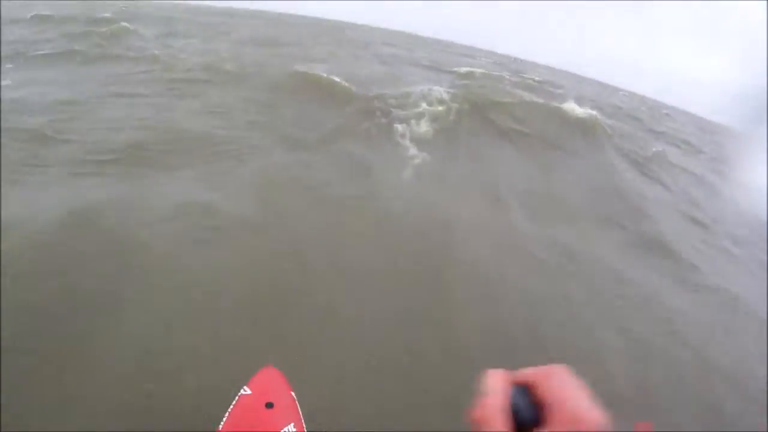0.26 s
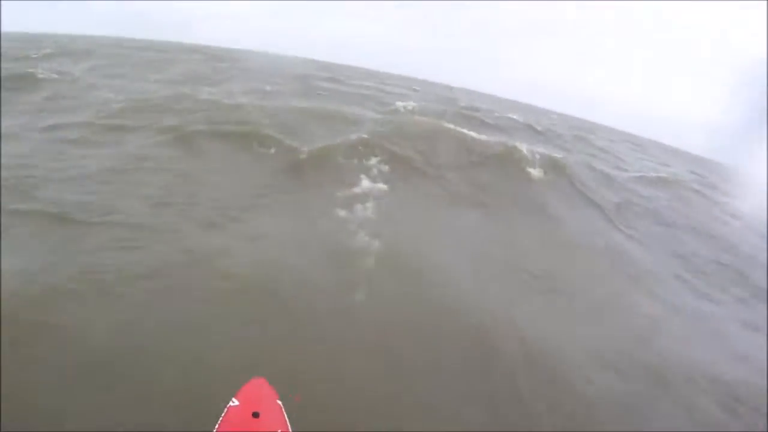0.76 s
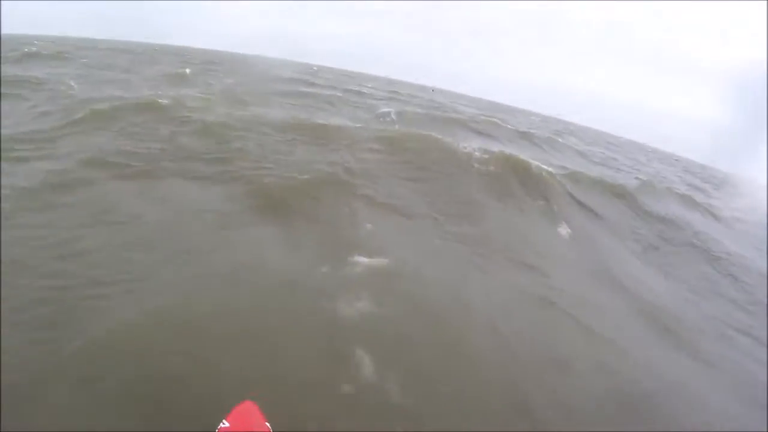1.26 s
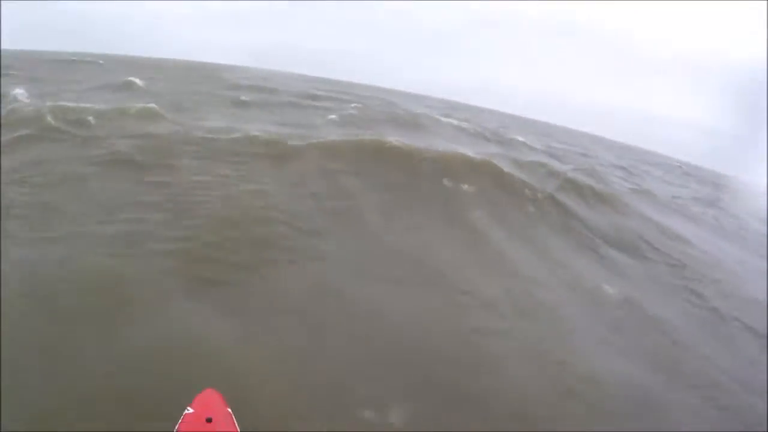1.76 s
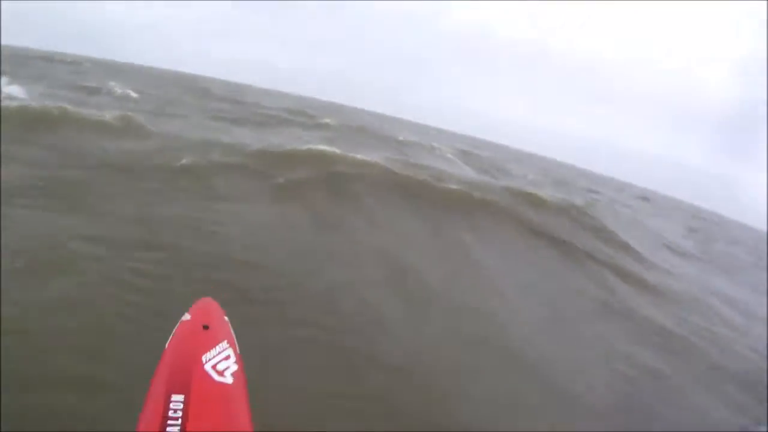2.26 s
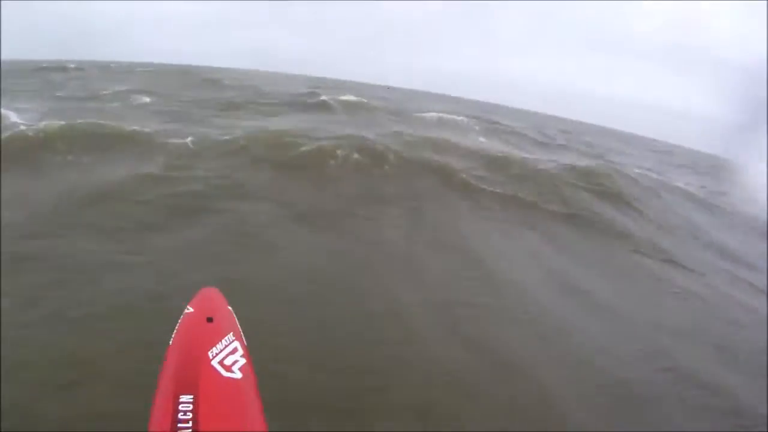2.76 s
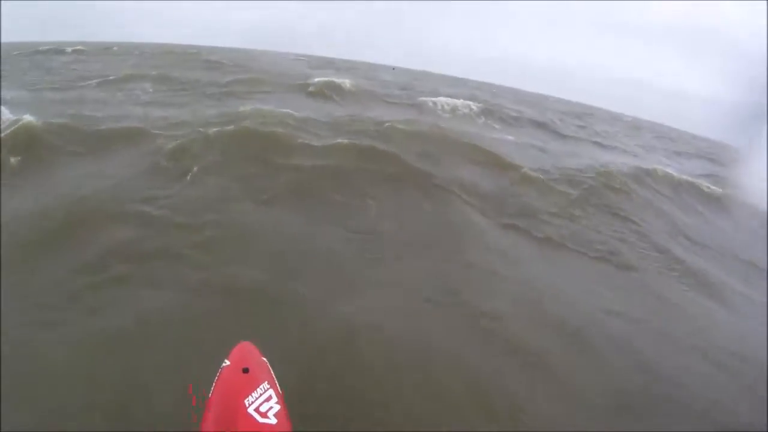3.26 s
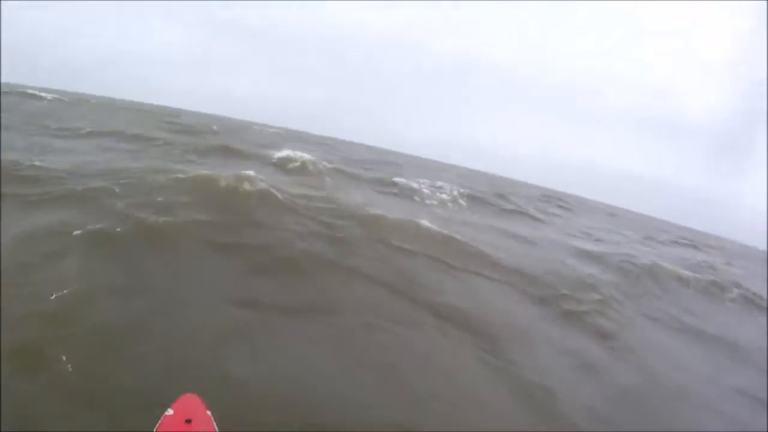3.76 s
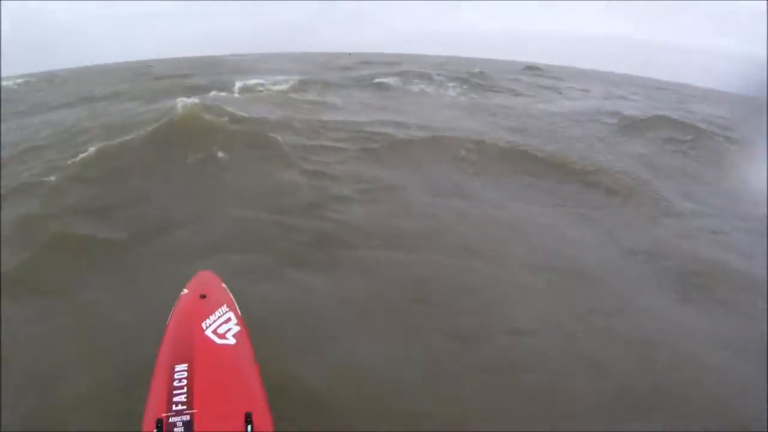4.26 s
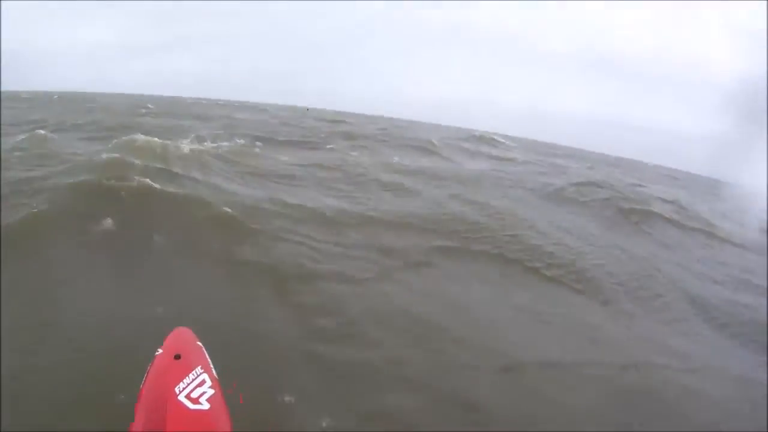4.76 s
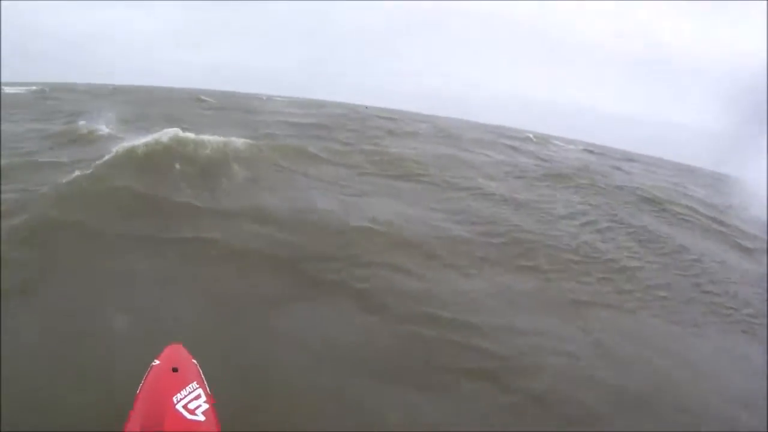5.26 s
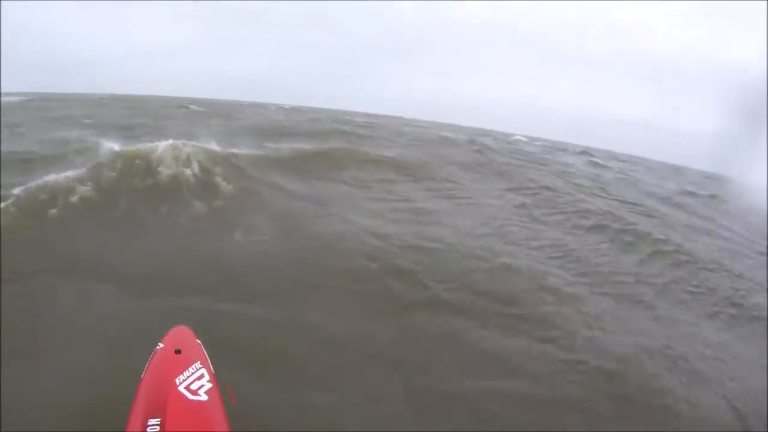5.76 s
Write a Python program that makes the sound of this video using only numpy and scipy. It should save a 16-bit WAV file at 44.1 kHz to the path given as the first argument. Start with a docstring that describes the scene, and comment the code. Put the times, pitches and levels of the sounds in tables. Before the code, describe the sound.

Continuous boxy wash and slosh along a hull, fuller and gushing in the first second and a half, then thinner and uneven, then hissier around three seconds. Fine mist crackles constantly and larger spray drops snap dry and short against the plastic around the microphone. Faint low gusts come and go, and two tiny wet gurgles slip by. Close, outdoor, no echo, nearly identical in both ears.

```python
"""On a board running through choppy, windy sea, the microphone sealed inside a plastic camera housing.
Foam hiss and water sloshing along the hull are noise passed through the resonances of the shell.
Spray and finer mist strike the shell itself and ring its modes for a few milliseconds.
Wind is low, lumpy noise swelling in gusts; short wet gurgles are puffs of narrow noise.
One capsule feeds both channels, each with its own faint circuit hiss."""
import sys
import numpy as np
from scipy import signal
from scipy.io import wavfile
from scipy.ndimage import uniform_filter1d

SR = 44100
rng = np.random.default_rng(int(sys.argv[2]) if len(sys.argv) > 2 else 0)


def persist_wave(psi):
    """Save psi, clipped to +-1, as 16-bit WAV."""
    counts = np.round(np.clip(psi, -1, 1) * 32767).astype(np.int16)
    wavfile.write(sys.argv[1], SR, np.atleast_2d(counts).T)


N = 265041

# Sea along the hull: (time [s], foam hiss level [dB], duller wash level [dB])
SEA_LEVELS = [(0, -57, -52), (.55, -54.5, -49), (1.05, -57, -49.5), (1.38, -56.5, -49), (1.6, -63, -53),
              (1.85, -58.5, -51.5), (2.05, -63.5, -53.5), (2.3, -59.5, -54), (2.45, -61, -58),
              (2.7, -54, -52), (3.05, -52, -53), (3.45, -53, -55), (3.75, -57, -57.5), (4.2, -60, -56),
              (4.5, -53.5, -53), (4.85, -55, -54), (5.1, -52.5, -51), (5.3, -52.5, -54),
              (5.6, -59.5, -58.5), (6.01, -58.5, -54.5)]
# Shell resonances, widths before narrowing, levels relative within a set:
# (frequency [Hz], width [Hz], level under hiss [dB], level under a drop [dB])
LOW_MODES = [(1489, 89, 2.5, -3), (1640, 178, 0.5, -12), (2016, 200, -9, -0.5), (2630, 390, 0.5, 9.5)]
MIDDLE_MODES = [(3470, 1020, 1, 9.5), (4440, 360, 1.5, -2), (4927, 1030, 5.5, 6), (5437, 390, -28, -8.5)]
HIGH_MODES = [(6885, 1280, -14.5, -3), (8230, 1350, -15, -11), (9820, 1300, -20, -18.5),
              (10360, 2980, -42, -1), (11700, 3500, -18.5, -4), (14600, 3200, -20, -2)]
# Air resonances in the shell: (frequency [Hz], width before narrowing [Hz], relative level [dB])
CAVITY_MODES = [(474, 35, -9.5), (673.4, 86, 0.5), (711.5, 21, -4), (888, 188, -7)]
# Resonance of the gush: (frequency [Hz], width before narrowing [Hz], relative level [dB])
GUSH_MODES = [(2046, 270, 0)]
# Swells of the gush: (time of the crest [s], length [s], rise [dB])
GUSH_SURGES = [(.42, .3, 6.5), (.72, 0.61, 6.5), (1.15, 0.63, 3.5), (2.75, 0.17, 6.5)]
# Wind spectrum at the shell: (frequency [Hz], relative level per Hz [dB])
WIND_SPECTRUM = [(20, -8), (60, -2), (93, -0.5), (135, -8.5), (300, -13.5), (700, -36)]
# Gusts: (time of the crest [s], length [s], rise over the lull [dB])
WIND_GUSTS = [(0, 0.37, 7), (.62, 0.52, 5.5), (1.15, 0.4, 2.5), (1.8, 0.18, 6.5), (2.7, 0.51, 5.5),
              (3.02, 0.082, 6), (3.808, 0.17, -1.5), (4.096, 0.11, 12), (4.45, 0.11, 3.5), (4.82, 0.2, 3.5),
              (5.1, 0.25, 8), (5.4, 0.17, 2.5)]
# Spray drops on the shell: (time [s], energy of the middle modes [dB],
# lean of the middle modes to the upper ones [dB], treble against the middle modes [dB])
SPRAY_DROPS = [(0.0243, -24, -3, -4), (0.0379, 2.5, 14, -10), (0.1058, -15.5, 13, -11.5),
               (.118, -17, 0, -14), (.137, -31, 2, -0.5), (.215, -33, 4, -1), (0.2628, -17, 11, -13),
               (0.269, -16, -2, -21), (.309, -29.5, 4, -3), (0.4711, -17.5, -3, -8.5), (.4793, -21, -2, -9),
               (0.4878, -23.5, -2, -2.5), (.4972, -19.5, 7, -13), (.5532, -23, 5, -5),
               (0.6205, -19, -1, -16), (0.6726, -17.5, 7, -5.5), (.6807, -19, 1, -5), (0.849, -24.5, 4, -1),
               (.856, -16, 5, -10.5), (1.0102, -17, 7, 0), (1.0141, -19.5, -8, -3.5), (1.0568, -21, 13, -1),
               (1.1457, 8.5, -5, -20), (1.158, -13.5, -1, -6), (1.2629, -19.5, 6, -16),
               (1.3452, -14, 6, -16), (1.3496, -8, 0, -7.5), (1.3708, -26, -4, -7), (1.3895, -21, 0, -7.5),
               (1.3998, -15, -8, -19), (1.443, -21, 1, -14), (1.4504, -17.5, -1, -13), (1.492, -28, 2, -3),
               (1.6769, -18, -9, -12), (1.683, -18.5, -1, -13), (1.7744, -19.5, -3, -8.5),
               (1.7826, -19.5, -5, -6), (1.7914, -22, -3, -4), (1.7982, -19, -3, -.5),
               (1.8413, -20.5, -5, -3.5), (1.8927, -23, -6, -7), (1.9074, -23, 12, -9),
               (1.93, -23, -5, -4.5), (1.9576, -12, -0.5, -10.5), (2.042, -12.5, 7, -13),
               (2.078, -24, -5, -10), (2.0908, -21, -7, -6), (2.1113, -18.5, 5, -2), (2.2279, -19, -4, -4),
               (2.2433, -19.5, 2, -16), (2.2933, -21, 0, -1.5), (2.535, -24, 6, -12), (2.577, -30, -4, -8),
               (2.5958, -12.5, -4.5, -7), (2.657, -26, 0, -5.5), (2.6877, -22, -2, -15),
               (2.702, -19, 3, -12), (2.7152, -22, 4, -5.5), (2.7506, -20.5, 7, -6), (2.775, -20.5, 0, -8),
               (2.814, -18.5, -3, -0.5), (2.8613, -20, 4, -9), (2.8646, -11, 0, -19), (2.8839, -20, 4, -16),
               (2.9152, -17, 0, -5), (2.953, -20.5, -18, -18), (3.0087, -19, -2, -1.5),
               (3.0132, -20, 2, -8), (3.0323, -19, 6, -15), (3.0638, -20.5, 6, -5), (3.081, -28, 2, -0.5),
               (3.12, -22.5, -8, -12), (3.4133, -14.5, -5.5, -14), (3.5336, -20, 2, -5.5),
               (3.64, -19, -10, -7.5), (3.737, -27.5, -6, -6.5), (3.8, -24, -5, -11), (3.816, -14, 10, -18),
               (3.905, -20, 8, -20), (3.9257, -15.5, -1, -17), (4.018, -27, -3, -1.5), (4.0413, -28, 5, -1),
               (4.064, -24.5, -1, -5), (4.1163, -24, -5, -9), (4.3613, -23, 6, -8), (4.4685, -8, -3, -14.5),
               (4.55, -24.5, -6, -4.5), (4.727, -27, 4, -5), (4.7385, -17.5, -7, -12),
               (4.835, -22, -6, -11), (4.931, -18, 9, -2.5), (4.9834, -17, 17, -23), (5.0123, -17.5, 2, -6),
               (5.0838, -4, 4, -6), (5.1226, -13, -2, -11), (5.138, -14, 9, -9), (5.1566, -26, 8, -8),
               (5.1646, -21.5, 3, -3.5), (5.2203, -30, -6, 1), (5.2525, -21, 1, -3.5),
               (5.2598, -13, -13, -11), (5.3034, -20.5, -3, -3), (5.4563, -23.5, -2, -3.5),
               (5.4691, -19.5, -1, -8), (5.7739, -12.5, -2, -5.5), (5.9774, -19.5, -9, -17),
               (5.9877, -19.5, 13, -1.5)]
# Wet blips: (start time [s], length [s], frequency [Hz], level [dB])
GURGLE_BLIPS = [(2.254, 0.065, 1620, -51.5), (4.075, 0.16, 1610, -57)]
# Circuit hiss spectrum: (frequency [Hz], relative level [dB])
HISS_SPECTRUM = [(100, -22), (300, 7.5), (1500, -33), (10000, 12)]

USUAL_FOAM_DB, USUAL_WASH_DB = -54.0, -52
FIZZ_DB, FIZZ_SWING = -65, 0.57  # at the usual foam; dB per dB of foam
GUSH_DB, GUSH_SWING = -62, 1.6  # at the usual wash; dB per dB of wash
SLOSH_DB, SLOSH_SWING, SLOSH_WIND = -61.5, 0.8, 0.48  # likewise; dB per dB of gust
LULL_DB = -73  # wind between gusts

# Low modes of a drop: level and scatter [dB]; dB per dB of its treble, lean and energy over LIGHT_DB
LOW_DB, LOW_SCATTER_DB = -3.5, 3
WITH_TREBLE, WITH_LEAN, WITH_SIZE = 0.46, -0.33, 0.28
LIGHT_DB = -15  # drops up to this energy add no extra low-mode level
STIFF = signal.butter(1, 1000, "highpass", fs=SR)  # the stiff shell passes little bass from a blow
MIST_PER_S, MIST_FLOOR_DB = 29, -47  # rate with the foam at -56 dB; energy of the finest drop
HISS_DB, EDGE_HZ = -78, 15800  # circuit hiss level before the band limit; upper band limit

HZ = np.fft.rfftfreq(512, 1 / SR)[:, None]
FINE_HZ = np.fft.rfftfreq(2048, 1 / SR)[:, None]  # finer pitch steps for the low sounds


def gain_of(db):
    """Turns decibels into an amplitude factor."""
    return 10 ** (np.asarray(db) / 20)


def evened(x):
    """Scales to rms 1."""
    return x / np.sqrt(np.mean(x ** 2) + 1e-20)


def read(points, hz):
    """Reads a spectrum on a log-frequency axis."""
    f, value = np.transpose(points)
    return np.interp(np.log(hz + 1), np.log(f + 1), value)


def course(table, column, t):
    """Reads one column of a table at the times t."""
    columns = np.transpose(table)
    return np.interp(t, columns[0], columns[column])


def swells_db(rows, t):
    """Sums bell-shaped rises in dB; at half its length from the crest each is down to 1/e."""
    return sum(db * np.exp(-(2 * (t - crest) / length) ** 2) for crest, length, db in rows)


def peaks(modes, hz, steep):
    """Magnitude of a set of resonances; steep narrows them and deepens the valleys between."""
    power = 0
    for mode_hz, width, db, *_ in modes:
        power = power + gain_of(2 * db) / (1 + (2 * (hz - mode_hz) / width) ** 2) ** steep
    return np.sqrt(power)


def noise(shape, patchy_db, flicker_db, size=512):
    """Noise of rms 1 with a given magnitude, drifting patches and a flicker common to all pitches."""
    frames = 4 * N // size + 5
    re, im, patches = rng.standard_normal((frames, len(shape), 3)).T
    patches = uniform_filter1d(patches, 6, 0)  # across pitch
    patches = evened(uniform_filter1d(patches, 16, 1))  # along time
    flicker = evened(uniform_filter1d(rng.standard_normal(frames), 5))
    spectrum = (re + 1j * im) * shape * gain_of(patchy_db * patches + flicker_db * flicker)
    sound = signal.istft(spectrum, nperseg=size, noverlap=3 * size // 4)[1]
    return evened(sound[:N])


def water():
    """Foam, wash, gush and slosh, each through its part of the shell; the treble swings less than the
    foam, gush and slosh follow the wash."""
    t = np.arange(N) / SR
    foam_db, wash_db = course(SEA_LEVELS, column=1, t=t), course(SEA_LEVELS, column=2, t=t)
    wash_rise_db = wash_db - USUAL_WASH_DB
    foam = noise(peaks(MIDDLE_MODES[1:], HZ, steep=2.6), patchy_db=1.3, flicker_db=1.5)
    fizz = noise(peaks(HIGH_MODES, HZ, steep=1.9), patchy_db=0.6, flicker_db=0.8)
    wash = noise(peaks(LOW_MODES + MIDDLE_MODES[:1], HZ, steep=1.36), patchy_db=1.0, flicker_db=1.98)
    gush = noise(peaks(GUSH_MODES, HZ, steep=1.4), patchy_db=2.2, flicker_db=1.2)
    slosh = noise(peaks(CAVITY_MODES, FINE_HZ, steep=1.3), patchy_db=1.6, flicker_db=1.5, size=2048)
    fizz_db = FIZZ_DB + FIZZ_SWING * (foam_db - USUAL_FOAM_DB)
    gush_db = GUSH_DB + GUSH_SWING * wash_rise_db + swells_db(GUSH_SURGES, t)
    slosh_db = SLOSH_DB + SLOSH_SWING * wash_rise_db + SLOSH_WIND * swells_db(WIND_GUSTS, t)
    return (gain_of(foam_db) * foam + gain_of(fizz_db) * fizz + gain_of(wash_db) * wash
            + gain_of(gush_db) * gush + gain_of(slosh_db) * slosh)


def wind():
    """Lumpy buffeting of the shell: low noise that swells with the gusts."""
    shape = gain_of(read(WIND_SPECTRUM, FINE_HZ))
    rumble = noise(shape, patchy_db=1.8, flicker_db=1.2, size=2048)
    return gain_of(LULL_DB + swells_db(WIND_GUSTS, np.arange(N) / SR)) * rumble


def ring(modes, chance, sharp, lean_db=0):
    """Modes start one after another as the drop spreads, each by its own random share; energy 1."""
    hz, width, _, db = np.transpose(modes)[..., None]
    share, detune, turn, late = chance[:, :len(modes), None]
    t = np.maximum(np.arange(500) / SR - 0.000288 * abs(late), 0)
    tones = np.sin(2 * np.pi * (hz * (1 + .02 * detune) * t + turn))
    attack = 1 - np.exp(-t / .0002)
    decay = np.exp(-np.pi * width / sharp * t - (t / .008) ** 2)  # higher sharp rings longer
    mode_db = db + 2.5 * share + lean_db * (hz > 4100)
    sound = (gain_of(mode_db) * attack * decay * tones).sum(0)
    return sound / np.linalg.norm(sound)


def drop(db, lean_db, high_db):
    """One drop rings the plastic; a smaller splash follows within about two milliseconds."""
    chance = rng.standard_normal((3, 4, 8))
    low_db = (LOW_DB + WITH_TREBLE * high_db + WITH_LEAN * lean_db
              + WITH_SIZE * max(db - LIGHT_DB, 0) + LOW_SCATTER_DB * rng.standard_normal())
    low = gain_of(low_db) * ring(LOW_MODES, chance[0], sharp=1.46)
    middle = ring(MIDDLE_MODES, chance[1], sharp=2.36, lean_db=lean_db)
    high = gain_of(high_db) * ring(HIGH_MODES, chance[2], sharp=2.2)
    splash = np.zeros(90)
    splash[[0, rng.integers(25, 90)]] = 1, .4
    return signal.lfilter(*STIFF, np.convolve(low + middle + high, splash))


def mist():
    """Fine drops at random on the shell, in sixteen colours, thicker where the foam is loud."""
    thick = gain_of(course(SEA_LEVELS, column=1, t=np.arange(N) / SR) + 56.0)
    size = gain_of(MIST_FLOOR_DB + 5.37 * np.minimum(rng.exponential(1, N), 3))
    hits = size * (rng.random(N) < MIST_PER_S * thick / SR)
    kind = rng.integers(0, 16, N)
    out = np.zeros(N)
    for k in range(16):
        fine_drop = drop(LIGHT_DB, lean_db=-2.0, high_db=-1.0)
        out += signal.oaconvolve(hits * (kind == k), fine_drop)[:N]
    return out


def spray():
    """Single larger drops strike the shell, each with its own energy and colour."""
    out = np.zeros(N + 1000)
    for start, db, lean_db, high_db in SPRAY_DROPS:
        sound = gain_of(db) * drop(db, lean_db, high_db)
        out[round(start * SR):][:len(sound)] += sound
    return out[:N]


def gurgles():
    """Short wet blips: a puff of noise in one narrow resonance."""
    out = np.zeros(N)
    for start, length, hz, db in GURGLE_BLIPS:
        narrow = signal.lfilter(*signal.iirpeak(hz, 7, SR), rng.standard_normal(8000))
        puff = narrow[:round(length * SR)]
        out[round(start * SR):][:len(puff)] += gain_of(db) * evened(puff) * np.hanning(len(puff))
    return out


def scene():
    """One capsule inside the housing feeds both channels."""
    return np.tile(water() + wind() + mist() + spray() + gurgles(), (2, 1))


def record(dry):
    """Each channel adds its own faint circuit hiss; then the band limit."""
    shape = gain_of(read(HISS_SPECTRUM, HZ))
    hiss = [noise(shape, patchy_db=0, flicker_db=0) for _ in dry]
    wet = dry + gain_of(HISS_DB) * np.array(hiss)
    band_limit = signal.firwin(101, EDGE_HZ, window=("kaiser", 9), fs=SR)
    return signal.oaconvolve(wet, band_limit[None], "same")


dry = scene()
out = record(dry)
persist_wave(out)
```